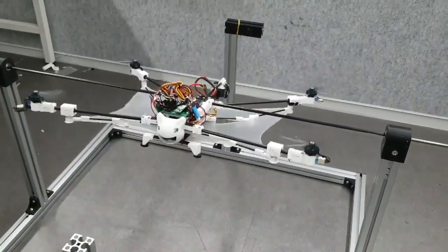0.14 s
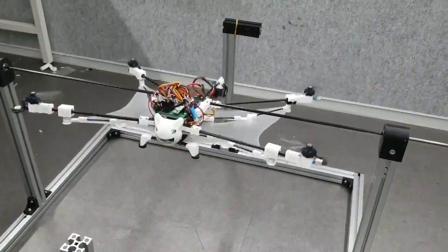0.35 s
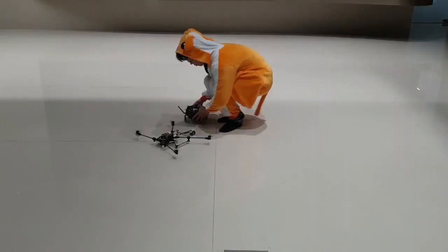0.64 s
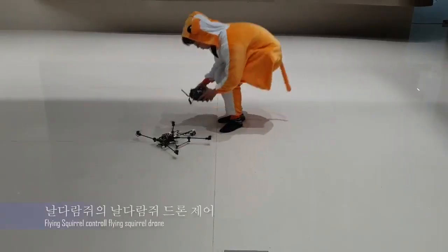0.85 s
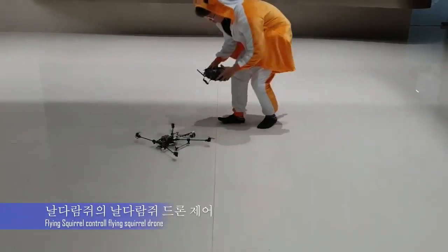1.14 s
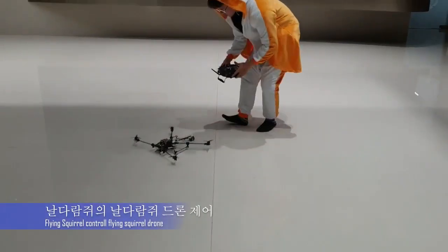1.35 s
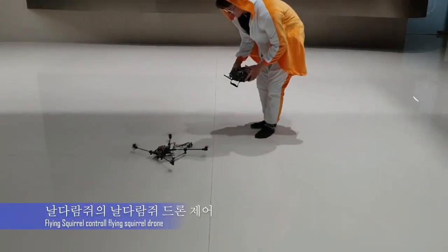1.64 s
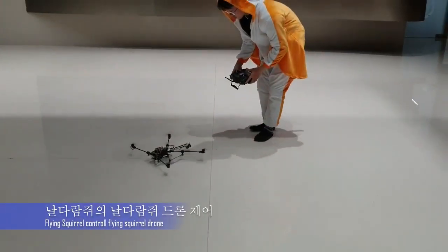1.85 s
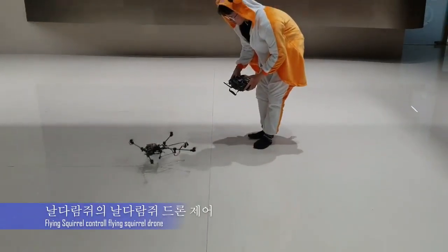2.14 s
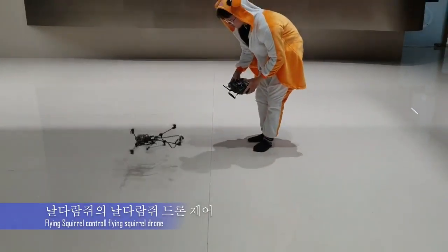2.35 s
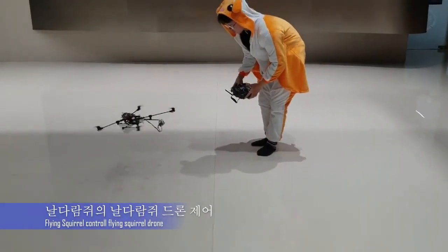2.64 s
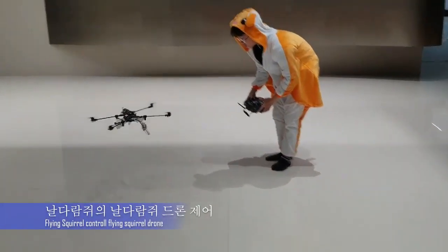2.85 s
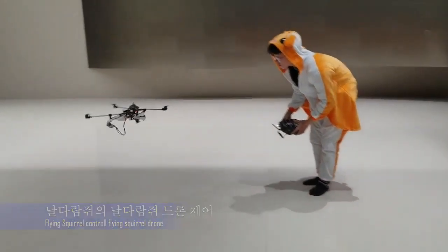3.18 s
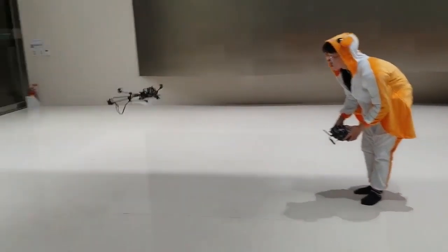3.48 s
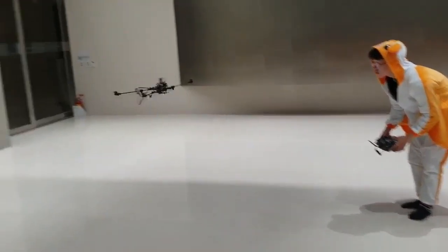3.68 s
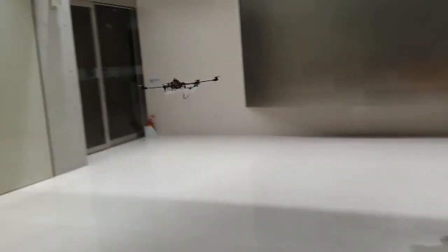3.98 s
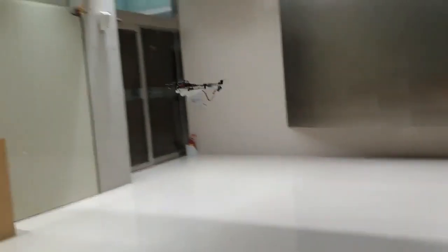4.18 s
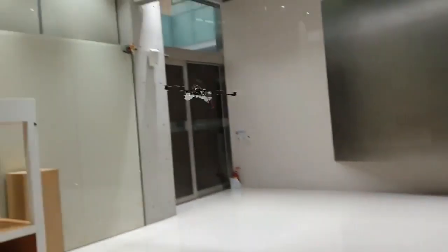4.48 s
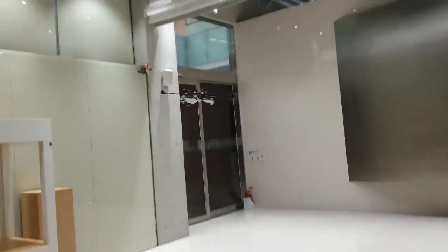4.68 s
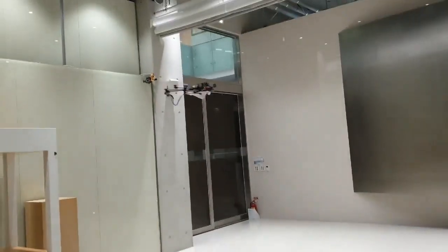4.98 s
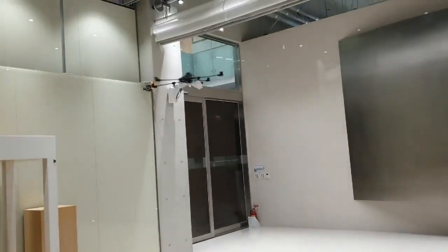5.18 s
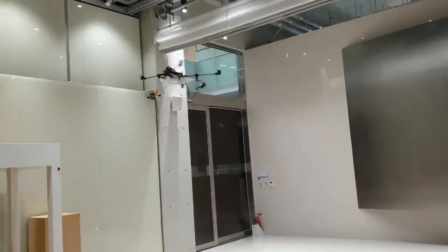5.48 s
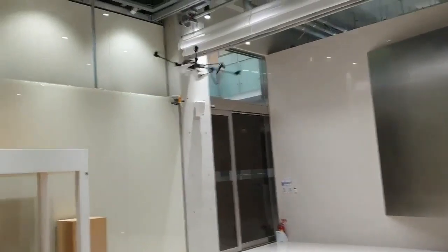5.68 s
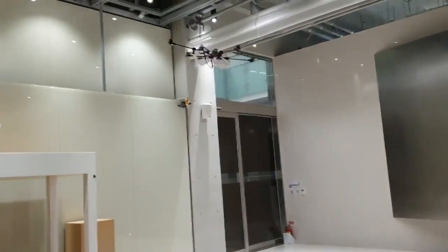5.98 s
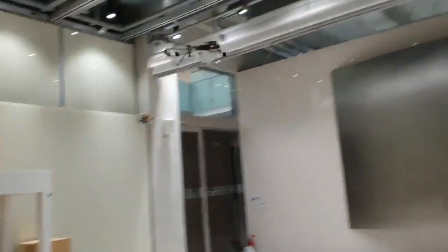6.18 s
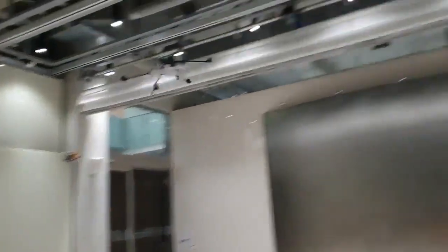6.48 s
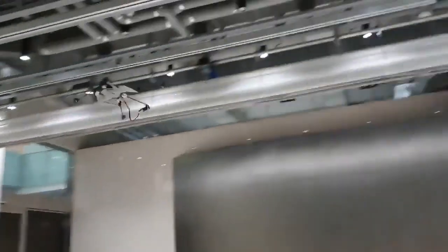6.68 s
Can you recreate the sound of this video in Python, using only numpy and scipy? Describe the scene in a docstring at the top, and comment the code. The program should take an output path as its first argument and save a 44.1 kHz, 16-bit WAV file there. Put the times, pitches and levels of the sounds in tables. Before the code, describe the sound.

A small drone whines and hisses loudly up close, cuts to near-quiet idling, then spins up and flies around a large bare hall.

```python
"""Small drone on a test frame, then in a hall

Two scenes of a four-rotor drone with three-blade propellers. First it strains close by on a test frame.
After a cut it idles on the floor of a large bare hall, spins up, lifts off and flies about.
Rotors are sines on multiples of a hunting shaft speed; blade hiss and room rumble are coloured noise.
The hall adds a blurring noise tail, mains hum and a few dull knocks."""
import sys
import numpy as np
from scipy import signal
from scipy.fft import rfft, irfft, next_fast_len
from scipy.io import wavfile

SR = 44100
rng = np.random.default_rng(int(sys.argv[2]) if len(sys.argv) > 2 else 0)


def persist_wave(psi):
    """Save psi, clipped to +-1, as 16-bit WAV."""
    counts = np.round(np.clip(psi, -1, 1) * 32767).astype(np.int16)
    wavfile.write(sys.argv[1], SR, np.atleast_2d(counts).T)


N = 301203
TIME_S = np.arange(N) / SR

# how the hall's sounds lean to one side at each pitch: pitch_hz [Hz], left_minus_right_db [dB]
HALL_LEAN = [(100, -0.5), (1000, 0), (15000, -1.3)]


def from_db(db):
    """Turn a level in decibels into a plain gain."""
    return 10 ** (np.asarray(db) / 20)


def rms_one(x):
    """Scale a signal to unit power."""
    return x / np.sqrt(np.mean(x ** 2) + 1e-20)


def in_time(rows):
    """Join the points of a timed table with straight lines, giving one value a sample for each column."""
    times_s, *columns = np.transpose(rows)
    return [np.interp(TIME_S, times_s, column) for column in columns]


def at_hz(points, hz):
    """Read a table of pitches at any pitch, with straight lines on a log-frequency axis."""
    pitch_hz, value = np.array(points).T
    return np.interp(np.log(hz), np.log(pitch_hz), value)


def drift(corner_hz):
    """Slow random wandering of spread 1: noise at one fortieth of the sample rate, low-passed twice."""
    step = 40
    pole = np.exp(-2 * np.pi * corner_hz * step / SR)
    noise = rng.standard_normal(N // step + 2002)
    slow = signal.lfilter([1], [1, -2 * pole, pole ** 2], noise)[2000:]   # skip the filter's start-up
    return np.interp(np.arange(N) / step, np.arange(len(slow)), rms_one(slow))


def stereo_noise(spectrum, lean, patchy_db):
    """Coloured noise, alike on both sides in the bass, unrelated in the treble; bands swell separately."""
    # how alike left and right are: pitch_hz [Hz], likeness [1 = same, 0 = unrelated]
    likeness = [(40, 0.8), (130, 1), (300, 1), (500, 0.8), (800, 0.8), (1600, 0.069), (5000, 0)]
    size = next_fast_len(N)
    hz = np.maximum(np.fft.rfftfreq(size, 1 / SR), 1)
    mid, side = rfft(rng.standard_normal((2, size))) * from_db(at_hz(spectrum, hz))
    alike = np.clip(at_hz(likeness, hz), -1, 1)
    signs = np.array([[1], [-1]])   # left, right
    pair = np.sqrt(1 + alike) * mid + np.sqrt(1 - alike) * side * signs
    pair = pair * from_db(signs * at_hz(lean, hz) / 2)
    group = np.floor(9 * np.log2(hz)) % 4   # ninth octaves dealt in turn to four swells
    out = 0
    for k in range(4):
        band = irfft(pair * (group == k), size)[:, :N]
        out = out + from_db(patchy_db * drift(15.8)) * band
    return out / np.std(out.mean(axis=0))   # the average of both sides has rms 1


def rotor(blade_hz, tone_db, orders, shaft_db, upper_db, hunt, flutter_db, gust):
    """Sines on shaft multiples: the flight controller makes the speed hunt, turbulent inflow shakes levels."""
    wander = .35 * drift(5.0) + drift(16.0)
    bounded = 1.6 * np.tanh(wander / 1.6)
    shaft_hz = blade_hz / 3 * (1 + hunt * bounded)   # three blades pass in one turn
    turns = np.cumsum(shaft_hz) / SR
    out = 0
    for multiple, order_db in orders:
        # below 3 are shaft tones, 3 is the blade tone, above 3 are the upper orders
        level_db = tone_db + order_db + shaft_db * (multiple < 3) + upper_db * (multiple > 3)
        shake_db = flutter_db * np.minimum(drift(26.0), 1.8)
        # gusts shift each blade passage, blurring the higher orders most (radians)
        smear = gust * multiple * drift(36.0)
        phase = 2 * np.pi * (multiple * turns + rng.random()) + smear
        out = out + np.sqrt(2) * from_db(level_db + shake_db) * np.sin(phase)
    return out


def room(x, t60_s, wet_db, side_hz):
    """Direct sound plus a dying noise tail that keeps changing; the sides differ mainly above side_hz."""
    age_s = np.arange(SR) / SR
    decay = from_db(-60 * age_s / t60_s) * (age_s > .008)
    mid, side = rng.standard_normal((2, 2, SR)) * decay   # two tails each
    side = signal.sosfilt(signal.butter(3, side_hz, "high", fs=SR, output="sos"), side)
    tails = np.array([mid + side, mid - side]) / np.sqrt(np.sum(mid ** 2))
    place = 3.0 * drift(1.14)   # radians: wanders between the two tails
    sends = x * np.array([np.cos(place), np.sin(place)])
    wet = signal.fftconvolve(sends[None], tails, axes=2).sum(axis=1)[:, :N]
    return (x + from_db(wet_db) * wet) / np.sqrt(1 + from_db(2 * wet_db))


def on_frame():
    """The close drone: three rotors heard apart and their blade hiss, dropping at the cut, then fading."""
    # blade rates, spreading as the airframe rolls near the end:
    # time_s [s], rotor_1_hz [Hz], rotor_2_hz [Hz], rotor_3_hz [Hz]
    frame_rates = [(0, 919, 900, 770), (.06, 862, 710, 870), (0.139, 897, 880, 770), (.25, 840.5, 850, 775),
                   (.33, 880, 845, 780), (.4, 913, 835, 790), (0.471, 848, 830, 765),
                   (0.589, 920, 810, 690), (.66, 877, 840, 730), (.74, 894, 810, 870)]
    # blade tone of each rotor, before the swells: level_db [dB]
    blade_tone_levels = [-41.5, -44.5, -46]
    # strength of each tone of a rotor: multiple [times the shaft rate], order_db [dB on the tone level]
    frame_orders = [(1, -20), (2, -18), (3, 4), (6, -0.5), (9, -2.5), (12, 0.5), (15, -0.5), (18, -7.5)]
    # all rotor tones swell and dip together: time_s [s], change_db [dB]
    frame_swell = [(0, 1), (.08, -2.5), (.15, -1), (.26, 0), (.33, -4), (.46, -1), (.53, -6), (.63, -2),
                   (.72, -9)]
    # blade hiss, around which the level wavers: time_s [s], level_db [dB]
    frame_hiss = [(0, -21.5), (.2, -23), (.4, -24), (.5, -23), (.74, -21.5)]
    # colour of that hiss: pitch_hz [Hz], relative_db [dB per Hz]
    hiss_colour = [(24, -51.5), (40, -16.5), (670, -26), (740, -5.5), (859, -16.5), (998, -22.5),
                   (1680, -11.5), (2060, -15), (2450, -0.5), (2840, -14.5), (3300, -7.5), (3840, -8),
                   (4400, -2), (5170, -0.5), (15500, -4)]
    # its lean to one side: pitch_hz [Hz], left_minus_right_db [dB]
    frame_lean = [(60, -1.5), (240, -3), (950, -6), (3770, 4), (15000, -6.5)]
    cut_s, drop_db, fade_s, fade_power = 0.7155, -11.5, 0.021, 1.13

    swell_db, = in_time(frame_swell)
    tones = 0
    for blade_hz, tone_db in zip(in_time(frame_rates), blade_tone_levels):
        tones = tones + rotor(blade_hz, tone_db + swell_db, frame_orders, shaft_db=0, upper_db=0,
                              hunt=0.0082, flutter_db=5.5, gust=.08)
    hiss_db, = in_time(frame_hiss)
    hiss = stereo_noise(hiss_colour, frame_lean, patchy_db=2.0)
    hiss = from_db(hiss_db + 0.89 * drift(3.6)) * hiss
    after_s = TIME_S - cut_s
    dying = from_db(drop_db) * np.clip(1 - after_s / fade_s, 0, 1) ** fade_power
    fade = np.where(after_s < 0, 1, dying)
    return fade * (room(tones, t60_s=0.075, wet_db=1.5, side_hz=400) + hiss)


def idling():
    """Motors ticking over on the floor: hiss, two rough tones and the thin switching whine of their drives."""
    # colour of the idling hiss: pitch_hz [Hz], relative_db [dB per Hz]
    idle_colour = [(300, -20), (900, -24), (1400, -12.5), (2150, -8.5), (2900, -7), (7000, -9.5),
                   (12000, -16.5), (14400, -12.5), (15500, -12.5)]
    # two rough tones rise with the throttle blip, sink away, then return: time_s [s], low_hz [Hz], high_hz
    # [Hz], high_tone_db [dB]
    idle_tones = [(.75, 1150, 1694, -73), (.88, 1190, 1790, -68), (1.02, 1223, 1790, -66),
                  (1.19, 1240, 1744, -68.5), (1.26, 1240, 1743, -88.5), (1.5, 1200, 1700, -91),
                  (1.57, 1200, 1720, -70)]
    # one blip of throttle
    blip_s, rise_s, fall_s = 1.046, 0.29, 0.27
    before_db, blip_db, settled_db = -75, -56.5, -82
    whine_hz, whine_db = 13993, -80.5

    level_db, = in_time([(blip_s - rise_s, before_db), (blip_s, blip_db), (blip_s + fall_s, settled_db)])
    out = from_db(level_db) * stereo_noise(idle_colour, HALL_LEAN, patchy_db=2.0)
    low_hz, high_hz, tone_db = in_time(idle_tones)
    for hz, db in (low_hz, tone_db - 9), (high_hz, tone_db):
        turns = np.cumsum(hz * (1 + .02 * drift(70.0))) / SR   # fast random speed changes roughen it
        side_phase = np.array([[.8], [-.8]]) * drift(6.0)
        out = out + from_db(db + 2.3 * drift(25.0)) * np.sin(2 * np.pi * turns + side_phase)
    whine = np.sin(2 * np.pi * whine_hz * TIME_S)
    return out + from_db(whine_db + 1.5 * drift(8.0)) * whine


def hall_plant():
    """Hall machinery: a 120 Hz mains hum wavering in level and phase, over ventilation rumble."""
    # both change while the drone is up: time_s [s], hum_db [dB], rumble_db [dB, before a 6 dB lift]
    plant_levels = [(.74, -83.5, -73), (1.45, -77, -79), (1.8, -62, -66.5), (2.5, -68.5, -71),
                    (3.6, -58.5, -76), (5.3, -56.5, -68), (6.83, -58, -73)]
    # colour of the rumble: pitch_hz [Hz], relative_db [dB per Hz]
    rumble_colour = [(12, -45), (20, -24), (43, -25), (64, -6.5), (81, -6), (205, -17), (295, -11.5),
                     (320, -20), (900, -32.5), (1170, -64), (1980, -120)]
    hum_db, rumble_db = in_time(plant_levels)
    phase = 2 * np.pi * 120 * TIME_S + .5 * drift(4.4)
    side_phase = np.array([[.35], [-.35]]) * drift(1.5)
    hum = from_db(hum_db + 3.5 * drift(7.8)) * np.sin(phase + side_phase)
    rumble = from_db(rumble_db + 6.0) * stereo_noise(rumble_colour, HALL_LEAN, patchy_db=-1.0)
    return hum + rumble


def late(hz):
    """The second rotor of a pair follows the throttle 0.06 s late."""
    return np.interp(np.arange(N) - .06 * SR, np.arange(N), hz)


def swells():
    """Brief bell-shaped swells and dips in level of the fast pair, slow pair and shaft tones, added in dB."""
    # centre and height of each bell: time_s [s], fast_pair_db [dB], slow_pair_db [dB], shaft_tones_db [dB]
    bells = [(1.79, 2, 4, 3), (2.04, 0, 2.5, 0), (2.18, 2, 0, -1), (2.26, -6, -3.5, -13), (2.35, 1, 3, -11),
             (2.46, -4, -1, -14), (2.55, 3.5, 5.5, 2), (2.79, 3, 6.5, -2), (3.35, 3, 1.5, 6),
             (3.46, -1.5, 2.5, 0), (3.94, -4, 0, -5), (4.15, 4, -0.5, 6.5), (4.27, 3, 2.5, 1.5),
             (4.55, 3, -3, 7.5), (5.04, 5, -15, -7), (5.2, -5, -1, 3), (5.6, 4.5, -0.5, -7),
             (6.08, 4, -7, 2.5), (6.3, 5.5, -7, 1), (6.41, -7.5, 1, 3), (6.51, 7.5, -5, 0.5),
             (6.83, -44, -25, 20)]
    width_s = 0.041
    out = 0
    for centre_s, *height_db in bells:
        bell = np.exp(-.5 * ((TIME_S - centre_s) / width_s) ** 2)
        out = out + np.outer(height_db, bell)
    return out


def in_hall():
    """The flight: two fast and two slow rotors, each pair a little apart in speed, and blade-edge hiss."""
    # leading rotor of each pair, and the hiss: time_s [s], fast_blade_hz [Hz], slow_blade_hz [Hz], hiss_db [dB]
    flight = [(1.45, 463, 470, -83.5), (1.57, 560, 510, -56), (1.68, 680, 680, -37.5),
              (1.77, 831.4, 746, -31), (1.88, 890.5, 775, -26), (2.02, 910, 812, -26), (2.2, 937, 812, -25),
              (2.43, 926, 817, -27), (2.68, 926, 782, -27.5), (2.8, 906.3, 766, -29.5),
              (2.97, 889, 804, -29.5), (3.3, 931.6, 800, -31), (3.52, 920, 817, -31),
              (3.85, 930, 814, -30.5), (4.15, 924.4, 825, -30.5), (4.3, 934.5, 785, -31),
              (4.5, 915, 820, -30.5), (4.8, 884, 777, -31.5), (5.25, 882, 772, -30),
              (5.4, 894.6, 800, -28.5), (5.6, 922, 816, -27), (6.08, 940.7, 780, -27.5),
              (6.4, 931, 834, -28.5), (6.6, 897.5, 820, -28.5), (6.83, 890, 776, -26.5)]
    # strength of each tone of a rotor: multiple [times the shaft rate], order_db [dB on the tone level]
    hall_orders = [(1, -16), (3, 1), (6, 4), (9, 5), (12, 0.5), (15, -18), (18, -21)]
    # colour of the hiss before wash and treble shaping: pitch_hz [Hz], relative_db [dB per Hz]
    hiss_colour = [(90, -26.5), (170, -25), (280, -14), (360, -20.5), (600, -12.5), (700, -16), (790, -19),
                   (900, -16.5), (1010, -16), (1150, -9), (1400, -10), (2050, -8), (2800, -5.5), (7200, -2),
                   (8200, -5.5), (15500, -3.5)]
    leave_s, away_s = 2.63, 2.96   # the drone draws away from the floor and the microphone
    near_wash_db, far_wash_db = -1.5, 3.5   # the wash under 900 Hz gains in the reverberant field
    hover_db, loaded_db = -29.5, -25   # hiss levels at hover and near full load
    tone_growth, wash_growth, upper_growth = 1.4, 0.33, 0.77   # dB per dB of hiss below those levels

    fast_hz, slow_hz, hiss_db = in_time(flight)
    # columns: upper orders dB, low wash dB, speed hunting (share), passage blur (radians per order)
    upper_db, wash_db, hunt, gust = in_time([(leave_s, -6.5, near_wash_db, .011, .085),
                                             (away_s, -15.5, far_wash_db, .017, .1)])
    below_hover_db = np.minimum(hiss_db - hover_db, 0)
    wash_db = wash_db + wash_growth * below_hover_db   # the low wash comes late in the spin-up
    load_db = hiss_db + (tone_growth - 1) * below_hover_db   # tones grow faster than the hiss
    fast_swell_db, slow_swell_db, shaft_db = swells()
    shaft_db = shaft_db - 0.27 * upper_db   # from afar the shaft tones stand out as the upper orders fade
    # until it leaves, the upper orders come in only near full load
    upper_db = upper_db + upper_growth * np.minimum(hiss_db - loaded_db, 0) * (TIME_S < leave_s)
    fast_db = load_db - 12 + fast_swell_db
    slow_db = load_db - 14.5 + slow_swell_db

    tones = rotor(fast_hz, fast_db, hall_orders, shaft_db - 6, upper_db - 4.0,
                  hunt=hunt, flutter_db=3.5, gust=gust)
    tones += rotor(late(fast_hz) * .965, fast_db - 9.5, hall_orders, shaft_db - 4.0, upper_db - 11,
                   hunt=0.02005, flutter_db=5.5, gust=gust)
    # an unbalanced propeller: loud shaft tone
    tones += rotor(slow_hz, slow_db, hall_orders, shaft_db + 0.5, upper_db,
                   hunt=hunt, flutter_db=5.0, gust=gust)
    tones += rotor(late(slow_hz) * 1.045, slow_db - 4.5, hall_orders, shaft_db - 1, upper_db,
                   hunt=.02, flutter_db=4.5, gust=gust)
    tones = room(tones, t60_s=0.47, wet_db=1.5, side_hz=440) * from_db([[-.8], [.8]])   # left, right

    hiss = stereo_noise(hiss_colour, HALL_LEAN, patchy_db=2.0)
    wash = signal.sosfilt(signal.butter(2, 900, fs=SR, output="sos"), hiss)
    treble = signal.sosfilt(signal.butter(2, [4500, 7800], "band", fs=SR, output="sos"), hiss)
    # close to the floor the downwash adds a fuller hiss in the lower treble
    treble_db = -.35 * np.maximum(wash_db, near_wash_db)
    hiss = hiss + (from_db(wash_db) - 1) * wash + (from_db(treble_db) - 1) * treble
    return tones + from_db(hiss_db + .5 * drift(4.4)) * hiss


def thumps():
    """Each knock is a quickly dying 55 Hz swing; it reaches the left capsule first and harder."""
    # dull knocks on the hand-held recorder: start_s [s], level_db [dB, before the swing's shape and side gain]
    knocks = [(5.06, -50), (6.06, -31), (6.086, -33)]
    side_time_s = TIME_S - np.array([[0], [.003]])   # the right side hears it later
    out = 0
    for start_s, level_db in knocks:
        age_s = np.maximum(side_time_s - start_s, 0)
        shape = age_s / 0.017 * np.exp(-age_s / 0.016)
        out = out + from_db(level_db) * np.sin(2 * np.pi * 55 * age_s) * shape
    return out * from_db([[4.0], [-4.0]])


def scene():
    """The hall comes in as the test frame fades."""
    entry = np.clip((TIME_S - .715) / 0.023, 0, 1)
    return on_frame() + entry * (idling() + hall_plant() + in_hall() + thumps())


def record(dry):
    """Cut the top steeply above 15540 Hz."""
    return signal.sosfilt(signal.ellip(12, .3, 75, 15540, fs=SR, output="sos"), dry)


dry = scene()
out = record(dry)
persist_wave(out)
```